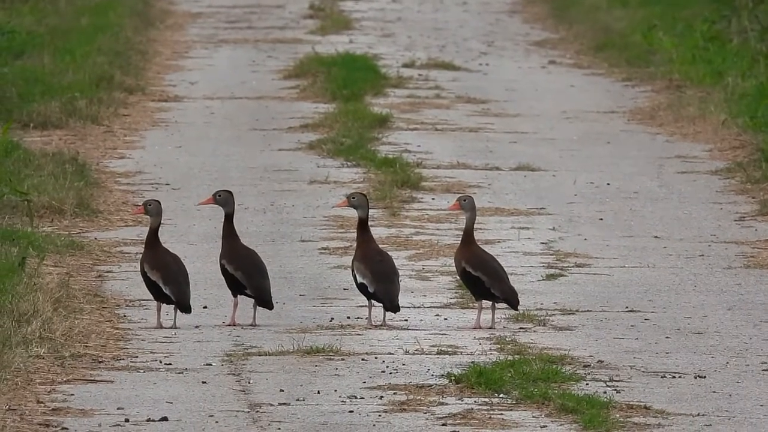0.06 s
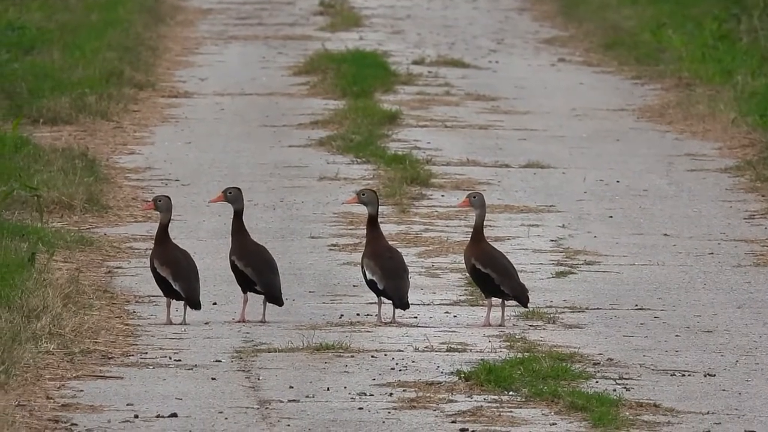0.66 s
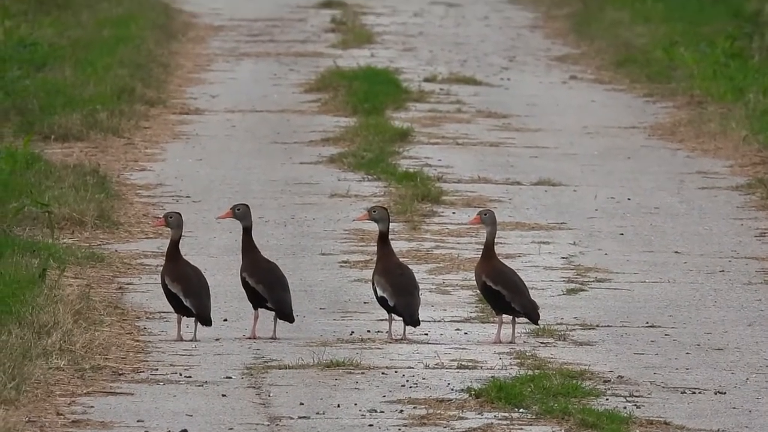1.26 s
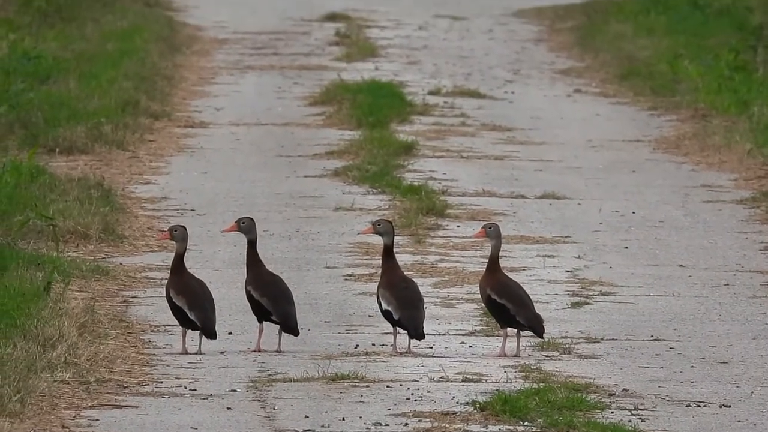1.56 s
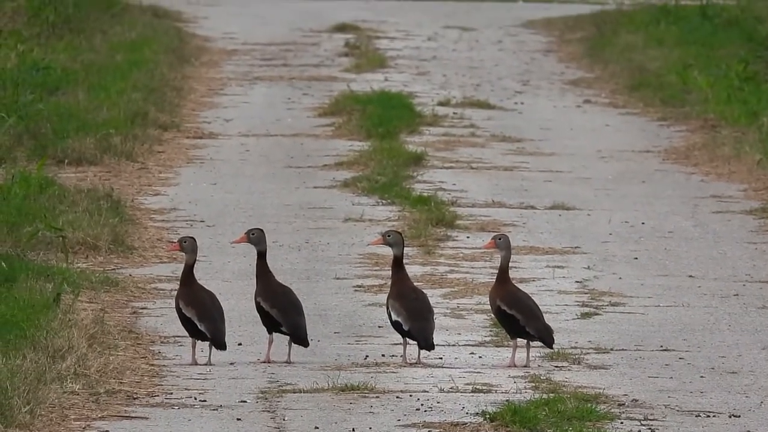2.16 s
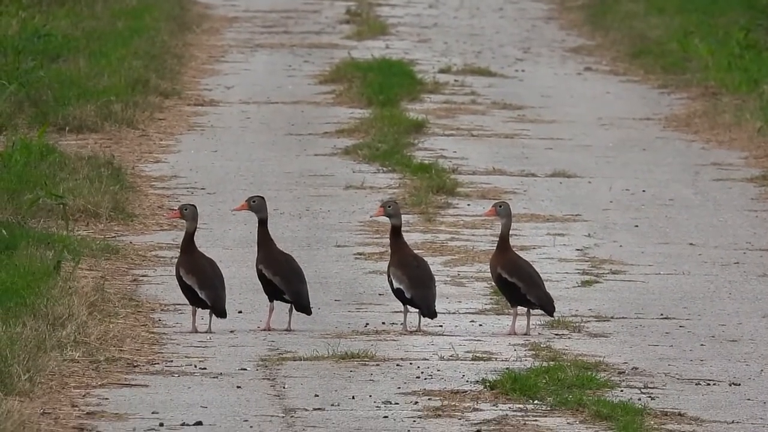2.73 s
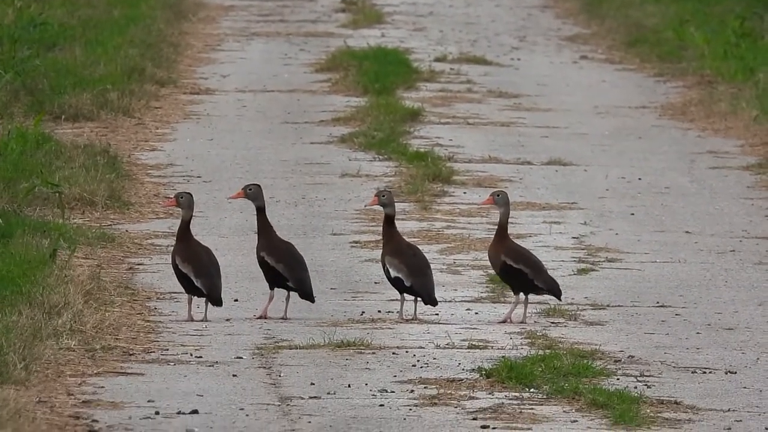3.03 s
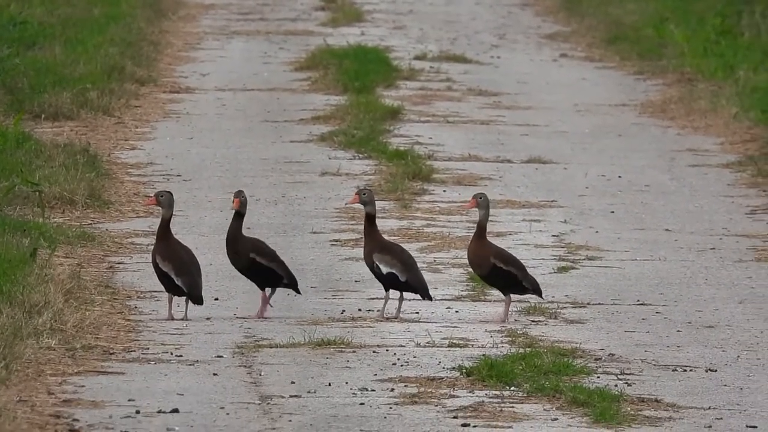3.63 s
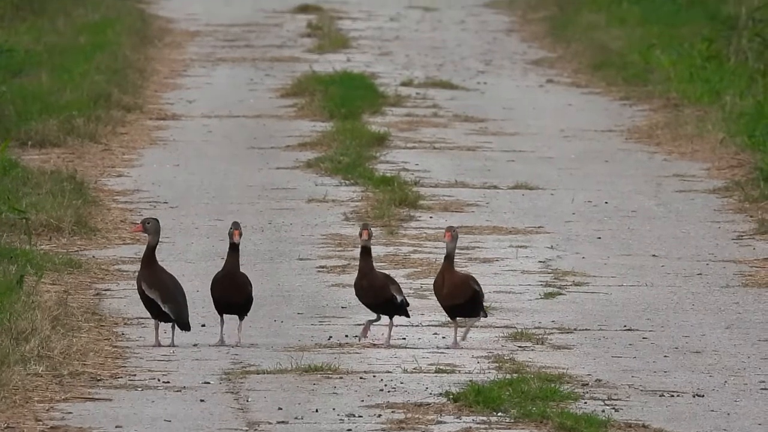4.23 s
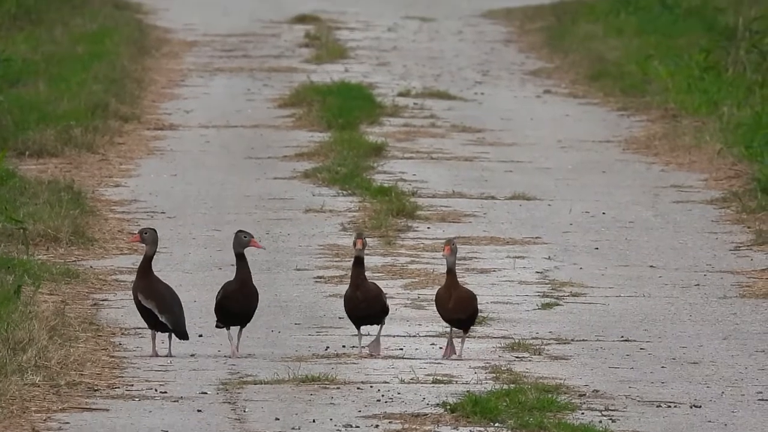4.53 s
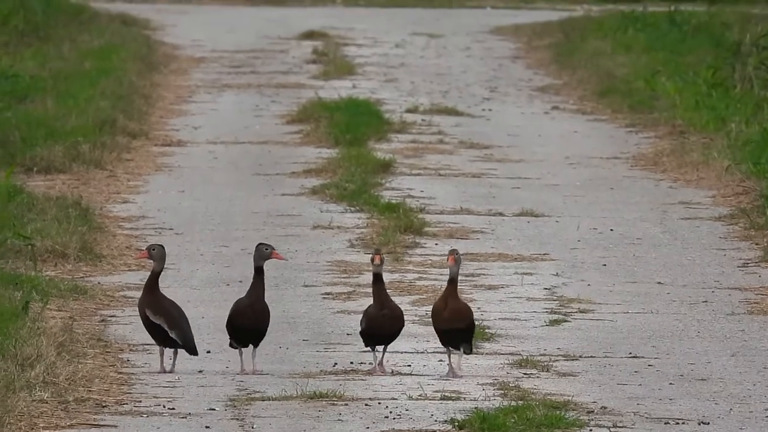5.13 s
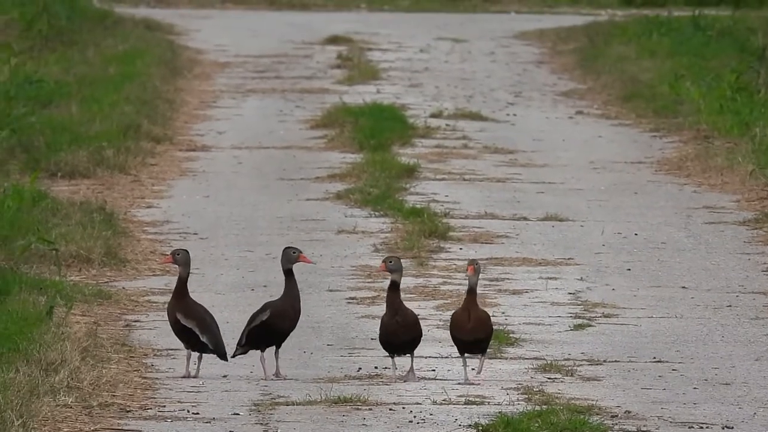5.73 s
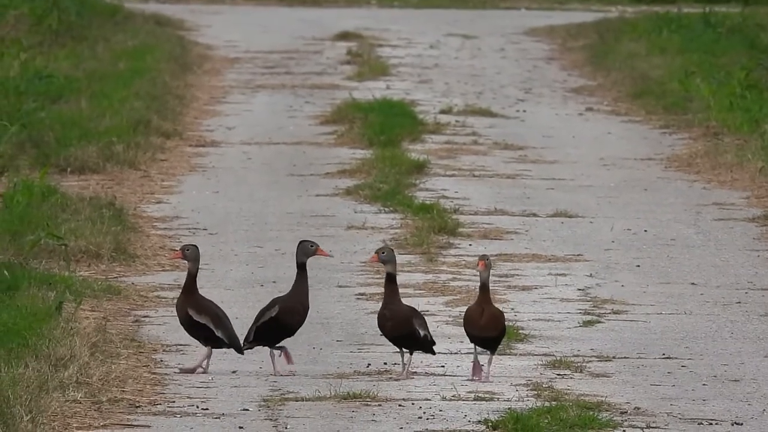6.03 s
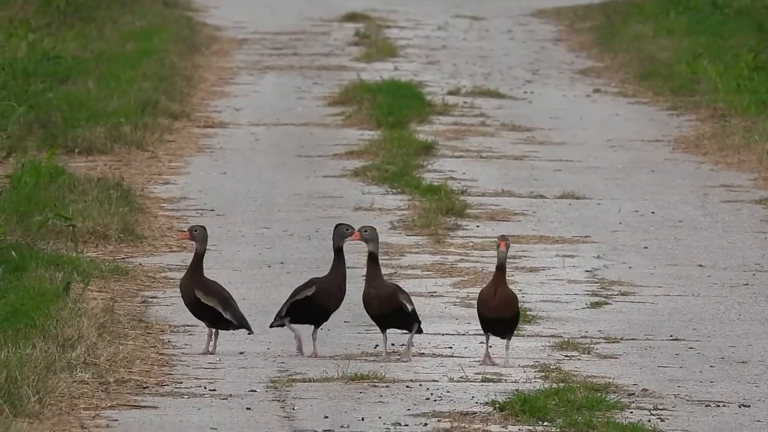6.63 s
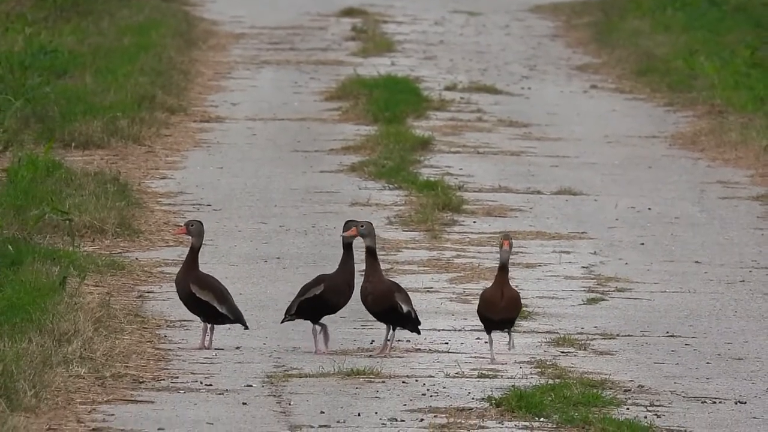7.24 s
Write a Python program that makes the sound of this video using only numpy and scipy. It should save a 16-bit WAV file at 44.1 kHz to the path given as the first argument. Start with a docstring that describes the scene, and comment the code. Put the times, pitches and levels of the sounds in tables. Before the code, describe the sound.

High duck whistles and chirps thin out halfway through, over gusty wind rumble and a few faint handling clicks.

```python
"""A flock of whistling ducks in open country, the nearer birds standing out of a distant chorus that
thins half way through. Each syrinx gives level whistles, hoarse squeals, low wheezes, or chirps that step
between the resonances of a long windpipe; bushes and banks scatter a faint tail. Right at the microphone,
wind buffets the two ports, mostly the left, and the hand-held camera gives a few small clicks.
Far off lies a soft wash of wind and grass."""
import sys
import numpy as np
from scipy import signal
from scipy.fft import rfft, irfft, next_fast_len
from scipy.io import wavfile
from scipy.ndimage import uniform_filter1d, minimum_filter1d, map_coordinates

SR = 44100
rng = np.random.default_rng(int(sys.argv[2]) if len(sys.argv) > 2 else 0)


def transcribe(signal):
    """Save signal, clipped to [-1, 1], as a 16-bit WAV file at the path in sys.argv[1]."""
    frames = np.atleast_2d(signal).T
    limited = np.clip(frames, -1, 1)
    pcm = np.round(limited * 32767).astype(np.int16)
    wavfile.write(sys.argv[1], SR, pcm)


N = 325899

# distant wind and grass: spectrum (f/Hz, level/dB) and strength (t/s, level/dB)
AIR_SPECTRUM = [(25, -57), (100, -5), (250, 10.5), (550, -3.5), (950, -2.5), (1400, -17.5), (2000, -25),
                (5000, -33.5), (13000, -76)]
AIR_LEVEL = [(0, -35), (3.3, -35), (3.9, -43.5)]

# knocks on the camera (t/s, click level/dB, left minus right/dB, thump level/dB)
HANDLING_KNOCKS = [(0.464, -52, 16, -41), (1.549, -48, -11, -50), (2.7304, -53, 9, -56),
                   (3.5195, -58, 9, -46), (3.647, -69, 8, -57), (3.852, -46.5, 25, -52),
                   (4.276, -64, 7, -59), (5.589, -45, 29, -40), (7.291, -63, 8, -48)]
# spectra of the click and of the thump in the camera body (f/Hz, level/dB)
CLICK_SPECTRUM = [(1000, -11), (5000, 6), (15000, -1.5)]
THUMP_SPECTRUM = [(30, -5), (70, 0), (700, -60)]

# wind strength on each microphone port (t/s, level/dB)
LEFT_GUSTS = [(0.0, -48), (0.32, -24.5), (0.38, -13), (0.46, -18), (0.54, -27), (0.72, -21), (1.02, -25.5),
              (1.28, -14.5), (1.54, -28.5), (1.74, -14.5), (1.9, -21), (2.92, -18), (3.0, -30.5),
              (3.2, -16.5), (3.4, -21.5), (3.62, -9.5), (3.74, -18), (3.8, -36), (3.84, -15), (4.04, -17),
              (4.36, -12), (4.46, -16), (4.78, -14), (4.9, -34), (5.0, -17), (5.14, -33), (5.2, -15.5),
              (5.24, -29.5), (5.4, -14.5), (5.46, -28), (5.56, -13.5), (5.92, -22), (5.96, -32),
              (6.16, -20.5), (6.96, -13.5), (7.22, -25.5), (7.34, -19.5), (7.38, -28.5)]
RIGHT_GUSTS = [(0.0, -25), (0.32, -45.5), (0.4, -26), (1.64, -21), (1.68, -37), (1.74, -11.5), (1.88, -30),
               (1.98, -15), (2.18, -50), (2.5, -43), (2.64, -20), (3.02, -38.5), (3.18, -21.5), (3.72, -30),
               (3.8, -44.5), (5.0, -45), (5.14, -25.5), (5.4, -20), (5.46, -34), (5.58, -19.5), (5.82, -32),
               (5.94, -20.5), (6.0, -33.5), (6.36, -28), (6.46, -47.5), (7.38, -38)]
# how finely the wind breaks up (t/s, small-eddy level/dB)
WIND_BREAKUP = [(0, -18), (3.3, -21), (3.7, -11), (4.1, -16), (4.65, -8), (5.7, -2), (6.4, -16.5),
                (7.39, -14.5)]
# spectra of the wind's body and of its small eddies (f/Hz, level/dB)
WIND_SPECTRUM = [(20, -60), (55, -68), (100, -35.5), (150, -8), (220, -0.5), (310, 2.5), (480, -2.5),
                 (700, -16.5), (1000, -32.5), (1500, -50.5), (2200, -53), (7000, -114)]
FINE_SPECTRUM = [(40, -48.5), (200, -1.5), (550, 12), (900, -1.5), (1400, -16), (2200, -52), (6000, -99.5)]
# single hard eddies on the ports (t/s, thud level/dB, left minus right/dB, crunch level/dB)
HARD_EDDIES = [(0.074, -27.5, -12, -53), (0.447, -15.5, 22, -50), (1.537, -15, -23, -40),
               (1.712, -15.5, -18, -34.5), (1.746, -24, -13, -45), (1.778, -31, 16, -55),
               (2.559, -17.5, 7, -47), (2.714, -17.5, 25, -49), (2.894, -23, 11, -55),
               (3.166, -20.5, 4, -54), (3.386, -18.5, -16, -46), (3.6, -6.5, 30, -30),
               (3.67, -15.5, 26, -50), (3.837, -16, 36, -38), (3.903, -33, 23, -57),
               (4.322, -17.5, 28, -33), (4.353, -16.5, 30, -38), (4.55, -28, 24, -57),
               (4.62, -10, 33, -34.5), (4.719, -29, 26, -40), (5.161, -21, -24, -36),
               (5.275, -28.5, -3, -44), (5.386, -22, -18, -34), (5.405, -12.5, 19, -51),
               (5.551, -20, 7, -37), (5.572, -24, 8, -41), (5.619, -24.5, 13, -45), (5.919, -23, -18, -37),
               (6.165, -18, 14, -52), (6.565, -37, 22, -48), (6.74, -19, 28, -52), (6.845, -19.5, 24, -44),
               (7.015, -19.5, 18, -43), (7.285, -17, 22, -57), (7.332, -15, 24, -63)]
# spectra of their thud and crunch (f/Hz, level/dB)
THUD_SPECTRUM = [(40, -50.5), (200, -6.5), (400, 11), (900, -9), (2000, -44.5), (9000, -71)]
CRUNCH_SPECTRUM = [(200, -25), (800, 0), (1400, -3), (2400, -21), (5000, -44), (12000, -75)]

# bearing of the flock from the microphone (t/s, side: 0 ahead, 1 well to the left, negative to the right)
FLOCK_BEARING = [(0, -0.025), (1.2, -0.11), (2.3, -0.6), (3.3, 0.43), (4.6, 0.82), (5.35, 0.24),
                 (5.8, 0.68), (7.39, 0.91)]
# the far flock: strength (t/s, level/dB) and colouring of its voices (f/Hz, level/dB)
FAR_LEVEL = [(0, -42), (.4, -41.5), (.65, -48.5), (1.25, -42.5), (2.0, -46.5), (2.7, -47.5), (3.4, -49),
             (3.8, -68.5), (4.9, -67.5), (5.4, -60.5), (6.4, -59.5), (7.39, -61)]
FAR_SPECTRUM = [(1400, -31.5), (2000, 1), (2500, 2.5), (2900, 8.5), (3600, 2), (4600, 4), (6000, -7.5),
                (7500, -5.5), (9500, -24.5), (13000, -28.5)]
# harmonics 1, 2, ... of the far calls (level/dB)
FAR_WHEEZE_HARMONICS = [-11.5, -3, -4.5, -7.5, -6, -10.5, -7]
FAR_PEEP_HARMONICS = [-2.5, 0, -4]
FAR_TWITTER_HARMONICS = [1.5, -12]

# nearer birds, arching calls (t/s, rise/s, fall/s, first f/Hz, crest f/Hz, level/dB)
NEAR_CHIRPS = [(0.058, 0.072, 0.032, 3670.0, 4190.0, -38.5), (0.112, 0.033, 0.0, 3500.0, 3760.0, -41),
               (0.113, 0.034, 0.034, 4830.0, 4980.0, -47), (0.163, 0.032, 0.044, 4130.0, 4810.0, -47.6),
               (0.212, 0.042, 0.023, 4430.0, 4520.0, -40.5), (0.307, 0.087, 0.0, 3300.0, 4570.0, -39),
               (0.309, 0.032, 0.027, 4130.0, 4560.0, -43), (0.334, 0.063, 0.0, 3770.0, 5540.0, -39),
               (0.498, 0.031, 0.011, 3690.0, 5250.0, -48), (0.594, 0.035, 0.0, 3370.0, 4460.0, -48),
               (0.862, 0.018, 0, 3900.0, 4180.0, -47.5), (0.964, 0.047, 0.0038, 3800.0, 4510.0, -49),
               (0.983, 0.068, 0.031, 4490.0, 6160.0, -51.2), (1.213, 0.025, 0.0094, 4170.0, 4830.0, -49.5),
               (1.264, 0.044, 0.0, 4530.0, 5510.0, -41), (1.356, 0.012, 0, 3970.0, 4700.0, -51),
               (1.471, 0.023, 0.034, 4750.0, 5220.0, -48), (1.477, 0.033, 0.033, 5530.0, 5780.0, -51),
               (1.541, 0.036, 0.017, 4130.0, 5040.0, -45.5), (1.607, 0.034, 0.0041, 4190.0, 4610.0, -47),
               (1.78, 0.046, 0.079, 3870.0, 5960.0, -48.5), (1.789, 0.026, 0.0067, 3870.0, 4560.0, -46.3),
               (1.857, 0.066, 0.022, 4350.0, 4460.0, -51), (1.929, 0.031, 0.031, 4270.0, 5180.0, -46),
               (1.948, 0.028, 0.065, 3950.0, 4420.0, -44.9), (2.053, 0.038, 0.0, 4030.0, 5180.0, -42.5),
               (2.137, 0.055, 0.069, 3770.0, 5320.0, -42), (2.315, 0.033, 0.022, 4130.0, 5070.0, -45.5),
               (2.348, 0.054, 0.014, 4570.0, 6640.0, -53), (2.488, 0.044, 0.021, 3170.0, 5410.0, -47),
               (2.619, 0.034, 0.015, 3770.0, 5160.0, -39), (2.831, 0.035, 0.0, 3070.0, 3610.0, -46.8),
               (2.923, 0.082, 0.0, 3330.0, 3810.0, -50), (3.112, 0.097, 0.013, 3160.0, 4310.0, -50.2),
               (3.228, 0.056, 0.0, 3330.0, 4570.0, -52), (3.391, 0.056, 0.0098, 3470.0, 4630.0, -50),
               (4.032, 0.069, 0.024, 3330.0, 4950.0, -64.5), (4.156, 0.034, 0.026, 3870.0, 4300.0, -64.3),
               (4.297, 0.11, 0.024, 2930.0, 5040.0, -56.5), (4.944, 0.017, 0.0052, 4210.0, 5260.0, -59.5),
               (4.964, 0.031, 0.018, 4970.0, 6070.0, -62), (4.976, 0.02, 0.019, 3630.0, 4170.0, -58),
               (5.501, 0.03, 0.044, 4940.0, 5690.0, -63.5), (5.667, 0.067, 0.0, 4160.0, 4350.0, -63.5),
               (5.807, 0.046, 0.0042, 4140.0, 4660.0, -58.5), (5.867, 0.057, 0.0, 4390.0, 4610.0, -63),
               (6.524, 0.037, 0.0, 4230.0, 4660.0, -56.5), (6.682, 0.083, 0.0, 2970.0, 3710.0, -55.6),
               (6.804, 0.039, 0.0029, 4270.0, 4790.0, -58.5), (6.961, 0.087, 0.014, 3530.0, 4690.0, -56.5),
               (7.021, 0.052, 0.0, 4370.0, 5910.0, -56), (7.163, 0.047, 0.0, 3970.0, 5680.0, -52)]
NEAR_WHEEZES = [(2.67, 0.077, 0.025, 1670, 1900, -59), (3.4, 0.05, 0.039, 1500, 1610, -54),
                (5.15, 0.13, 0.011, 1300, 1400, -61.5), (5.27, .155, 0.072, 1334, 1580, -54),
                (5.78, .15, 0.0083, 1370, 1574, -62.5), (6.1, .19, 0.041, 1460, 1570, -61)]
# nearer birds, held notes (t/s, rise/s, fall/s, crest f/Hz, level/dB)
NEAR_WHISTLES = [(0.0, 0.0078, 0.087, 3250, -37), (0.006, 0.017, 0.023, 2890, -41),
                 (0.067, 0.1, 0.121, 3110, -45), (0.144, 0.03, 0.17, 3140.0, -40.0),
                 (0.247, 0.049, 0.082, 2833, -37.5), (0.387, 0.021, 0.013, 3430, -45.5),
                 (0.433, 0.025, 0.16, 2825, -42), (0.467, 0.061, 0.09, 3056, -44.5),
                 (0.682, 0.039, 0.062, 2830, -42), (0.761, 0.014, 0.027, 3400, -40.5),
                 (0.867, 0.0086, 0.042, 2870, -41.5), (1.027, 0.042, 0.064, 3220, -46),
                 (1.095, 0.13, 0.0023, 3560, -43.5), (1.274, 0.022, 0.042, 2910.0, -48),
                 (1.355, 0.018, 0.019, 3380.0, -43), (1.427, 0.049, 0.054, 2600, -45),
                 (1.557, 0.051, 0.07, 2950.0, -50.5), (1.667, 0.056, 0.039, 2820.0, -42),
                 (1.877, 0.031, 0.038, 2770, -45), (1.955, 0.044, 0.12, 2850, -38.5),
                 (2.077, 0.024, 0.041, 2980, -42.5), (2.517, 0.033, 0.043, 2960, -45.5),
                 (2.615, 0.018, 0.039, 2720, -42.2), (2.596, 0.054, 0.056, 3220, -45.5),
                 (2.652, 0.005, 0.055, 3600, -44), (2.697, 0.024, 0.11, 2990, -44.5),
                 (2.945, 0.12, 0.085, 2810, -42.5), (3.073, 0.11, 0.14, 3094, -45),
                 (3.192, 0.019, 0.098, 2750.0, -41.5), (3.3, 0.065, 0.068, 3210, -42.5),
                 (3.456, 0.029, 0.025, 3220, -44), (3.483, 0.057, 0.116, 3070, -50),
                 (3.758, 0.016, 0.024, 2890, -46), (3.747, 0.095, 0.014, 3180, -55),
                 (3.943, 0.088, 0.0, 3000.0, -47), (4.442, 0.011, 0.021, 2750.0, -54.5),
                 (4.594, 0.021, 0.066, 2914, -51), (5.4, 0.029, 0.079, 3020.0, -52),
                 (5.667, 0.008, 0.11, 3120, -56.5), (6.121, 0.047, 0.095, 3090, -51.5),
                 (6.337, 0.094, 0.053, 3040, -48.5), (6.324, 0.093, 0.031, 3260.0, -56),
                 (6.535, 0.023, 0.094, 3020, -47), (6.613, 0.011, 0.012, 2750, -55),
                 (6.7, 0.003, 0.064, 2950, -53.5), (6.762, 0.018, 0.024, 3320, -49.5),
                 (7.147, 0.077, 0.034, 3070, -53)]
NEAR_SQUEALS = [(0, .08, 0.12, 3390, -48.5), (.29, 0.079, 0.056, 3350, -48.5),
                (2.5, 0.063, 0.025, 3790, -45.5), (2.59, .13, 0.0083, 3880, -48.5),
                (6.455, 0.023, .035, 3080, -52.5)]
THIN_OVERTONES = [(.17, 0.027, 0.13, 6480, -50), (1.1, 0.21, 0, 7200, -53), (1.97, 0.066, 0, 7440, -56),
                  (3.39, .05, 0.19, 9420, -65.5)]
# harmonics 1, 2, ... of the nearer calls (level/dB)
CHIRP_HARMONICS = [0.5, -28]
WHEEZE_HARMONICS = [-29.5, -2, -0.5, -0.5, -10.5, -18, -21.5]
WHISTLE_HARMONICS = [0.5, -26, -32]
SQUEAL_HARMONICS = [2, -11, -19]


def undb(db):
    """Decibels to gain."""
    return 10 ** (np.asarray(db) / 20)


def unit(x):
    """Scale to rms 1."""
    return x / np.sqrt(np.mean(x ** 2))


def curve(rows):
    """Join (t/s, value) rows with straight lines."""
    return np.interp(np.arange(N) / SR, *np.transpose(rows))


def colour(x, spectrum):
    """Causal filter through (f/Hz, level/dB) points."""
    hz, db = np.transpose(spectrum)
    size = next_fast_len(2 * N, real=True) // 2 * 2
    bins_hz = np.arange(size // 2 + 1) * SR / size
    gain = undb(np.interp(np.log(bins_hz + 1), np.log(hz), db))
    # folding the cepstrum gives minimum phase
    cepstrum = irfft(np.log(gain))
    cepstrum[1:size // 2] *= 2
    cepstrum[size // 2 + 1:] = 0
    return irfft(rfft(x, size) * np.exp(rfft(cepstrum)))[..., :N]


def walk(rate, size=N):
    """Smooth chance that turns about `rate` times a second; spread near 1."""
    steps = rng.standard_normal(8192)
    return map_coordinates(steps, [np.arange(size) * rate / SR], order=2, mode="wrap")


def sides(pan_db):
    """Left and right gains, pan_db apart, of constant total power."""
    return unit(undb(np.array([[pan_db], [-pan_db]]) / 2))


def add(out, start, sound):
    """Mix a sound in at its time."""
    i = int(np.clip(start * SR, 0, N))
    out[:, i:i + sound.shape[-1]] += sound[..., :N - i]


def distant_air(width=0.38):
    """A soft, wide wash of wind and grass, far from the microphone."""
    mid, side = colour(rng.standard_normal((2, N)), AIR_SPECTRUM)
    wash = unit(np.array([mid + width * side, mid - width * side]))
    return wash * undb(curve(AIR_LEVEL) + walk(7.6))


def knocks(rows, spectrum, decay_s, gain_db):
    """Brief bursts of pressure through a resonance, each scaled by its peak."""
    out, t = np.zeros((2, N)), np.arange(2048) / SR
    response = colour(signal.unit_impulse(N), spectrum)[:len(t)]
    for start, db, pan_db in rows:
        pressure = rng.standard_normal(len(t)) * np.exp(-t / decay_s)
        burst = signal.fftconvolve(pressure, response)
        add(out, start, burst / np.abs(burst).max() * undb(db + gain_db) * sides(pan_db))
    return out


def handling():
    """Each knock of the hand clicks at the microphone and thumps through the camera body."""
    rows = np.array(HANDLING_KNOCKS)
    clicks = knocks(rows[:, :3], CLICK_SPECTRUM, decay_s=.00093, gain_db=9)
    thumps = knocks(rows[:, [0, 3, 2]], THUMP_SPECTRUM, decay_s=.004, gain_db=4)
    return clicks + thumps


def port_wind(gusts, flutter_db, gain_db=0, sway_db=1.26):
    """Eddies tumble over one port in quick bursts; harder gusts break into smaller, brighter ones."""
    gust_db = curve(gusts) + sway_db * walk(17)
    breakup_db = curve(WIND_BREAKUP)
    eddies = rng.standard_normal(N) * undb(flutter_db * walk(130))
    body = unit(colour(eddies, WIND_SPECTRUM))
    deep = unit(signal.sosfilt(signal.butter(4, 141.8, fs=SR, output="sos"), body))
    fine = unit(colour(eddies * undb(5.55 * walk(300)), FINE_SPECTRUM))
    rumble = body + undb(-28 - breakup_db) * deep + undb(breakup_db + gust_db + 17) * fine
    # the gust sets the strength, the eddies only its grain
    running_rms = np.sqrt(uniform_filter1d(rumble ** 2, SR // 14))
    return rumble / running_rms * undb(gust_db + gain_db)


def lulls(stall_s=.02, dip_db=-4.5):
    """Gain of the wind at the ports: the flow stalls just before each hard eddy breaks."""
    t = np.arange(N) / SR
    stalled = sum((t > start - stall_s) & (t < start) for start, *_ in HARD_EDDIES)
    return undb(dip_db * uniform_filter1d(np.minimum(stalled, 1.), size=128))


def buffets():
    """Each hard eddy thuds right on the port with a short, brighter crunch."""
    rows = np.array(HARD_EDDIES)
    thuds = knocks(rows[:, :3], THUD_SPECTRUM, decay_s=.0095, gain_db=6)
    crunch = knocks(rows[:, [0, 3, 2]], CRUNCH_SPECTRUM, decay_s=.012, gain_db=4)
    return thuds + crunch


def field_scatter(calls, t60_s=1.0, wet_db=-14):
    """Bushes and banks scatter a short, diffuse tail back to each port."""
    t = np.arange(SR) / SR
    tail = rng.standard_normal((2, SR)) * np.exp(-np.log(1000) * t / t60_s)
    scattered = signal.fftconvolve(calls, unit(tail) / np.sqrt(SR), axes=1)[:, :N]
    return calls + undb(wet_db) * scattered


def off_axis(calls, lead_s=.00009, shade_db=4.5):
    """Birds off to one side reach that port earlier and louder, by lead_s and shade_db at side 1."""
    side = curve(FLOCK_BEARING)
    ports = []
    for channel, half in zip(calls, (.5, -.5)):
        shifted = map_coordinates(channel, [np.arange(N) + half * side * lead_s * SR], order=3)
        ports.append(shifted * undb(half * side * shade_db))
    return np.array(ports)


def arch(rise_s, fall_s, first_hz, crest_hz, last_hz):
    """Pitch of one call: it climbs, rounds off at the crest, then droops."""
    up, down = (np.linspace(0, np.pi / 2, int(s * SR)) for s in (rise_s, fall_s))
    return np.concatenate([first_hz + (crest_hz - first_hz) * np.sin(up),
                           last_hz + (crest_hz - last_hz) * np.cos(down)])


def windpipe(hz, pull, detune_hz, resonance_hz=5082, spacing_hz=701):
    """With pull above 0, a sweep clings to each windpipe resonance and fades as it jumps to the next."""
    def offset(f):
        return 2 * np.pi * (f - resonance_hz - detune_hz) / spacing_hz
    gain = 1 - pull * np.sin(offset(hz) / 2) ** 4
    for _ in range(2):
        hz = hz - pull * spacing_hz / (2 * np.pi) * np.sin(offset(hz))
    return hz, gain


def syrinx(pitch_hz, harmonics_db, waver, wander, pull=0, spread_db=3, port_lag_s=.00004):
    """One call: the syrinx follows its pitch, trembling and rasping as the note swells and fades."""
    size = len(pitch_hz)
    drifting_hz = pitch_hz * (1 + wander * walk(45, size))
    hz, pipe_gain = windpipe(drifting_hz, pull, detune_hz=60 * rng.standard_normal())
    hz = hz * (1 + waver * walk(260, size))
    # each bird stands in its own direction, so it reaches one port a little earlier
    lag, pan = rng.standard_normal(2)
    phase = 2 * np.pi * (np.cumsum(hz) / SR + hz * lag * port_lag_s * np.array([[.5], [-.5]]))
    tone = sum(undb(db) * np.sin(k * phase) * (k * hz < SR / 2) for k, db in enumerate(harmonics_db, 1))
    progress = np.linspace(0, 1, size)
    swell = np.sin(np.pi / 2 * np.minimum(np.minimum(progress, 1 - progress) / .15, 1))
    flutter = undb(2 * walk(104, size) + 2 * walk(28, size))
    # an unsteady voice is also a raspy one
    rasp = 1 + 20 * waver * walk(700, size)
    return np.sqrt(2) * tone * swell * flutter * pipe_gain * rasp * sides(spread_db * pan)


def far_ducks(count=400, gain_db=3.5):
    """Across the field, reedy wheezes, short peeps and stepping twitters overlap, blurred by distance."""
    out = np.zeros((2, N))
    for i, (jitter, kind, pitch, length, bend, loud) in enumerate(rng.random((count, 6))):
        if kind < .25:
            span, hz = .07 + .068 * length, 1300 + 400 * pitch
            contour = arch(span / 2, span / 2, hz * (1 - .16 * bend), hz, hz * (.86 + .14 * bend))
            call = syrinx(contour, FAR_WHEEZE_HARMONICS, waver=.0067, wander=.008)
        elif kind < .5:
            span, hz = .033 + .031 * length, 2300 + 1300 * pitch
            contour = arch(span / 2, span / 2, hz * .88, hz, hz * (.82 + .17 * bend))
            call = syrinx(contour, FAR_PEEP_HARMONICS, waver=.008, wander=.011)
        else:
            span, hz = .027 + .036 * length, 3900 + 3300 * pitch
            contour = arch(span * .6, span * .4, hz * (.9 - .14 * length), hz, hz * (.76 + .15 * bend))
            call = syrinx(contour, FAR_TWITTER_HARMONICS, waver=.011, wander=.008, pull=.4)
        start = (i + jitter) / count * N / SR - .05
        add(out, start, undb(6.5 * loud) * call)
    # their sound crosses more of the field, so it gets a scattering of its own
    chorus = colour(field_scatter(off_axis(out)), FAR_SPECTRUM)
    return unit(chorus) * undb(curve(FAR_LEVEL) + gain_db)


def glides(rows, harmonics_db, gain_db, waver, droop, pull=0):
    """Nearer calls that climb to a crest, then droop by a share of their pitch or break off there."""
    out = np.zeros((2, N))
    for start, rise, fall, first_hz, crest_hz, db in rows:
        contour = arch(rise, fall, first_hz, crest_hz, crest_hz * (1 - droop))
        call = syrinx(contour, harmonics_db, waver, wander=.003, pull=pull, spread_db=3.5)
        add(out, start, undb(db + gain_db) * call)
    return out


def held_notes(rows, harmonics_db, gain_db, waver, scoop=.035):
    """Nearer notes that start just under their pitch and sag at the end."""
    scooped = [(start, rise, fall, hz * (1 - scoop), hz, db) for start, rise, fall, hz, db in rows]
    return glides(scooped, harmonics_db, gain_db, waver, droop=.06)


def near_ducks():
    """The birds closest to the microphone, each call distinct; a stronger waver makes squeals hoarse."""
    chirps = glides(NEAR_CHIRPS, CHIRP_HARMONICS, gain_db=1.8, waver=.005, droop=.14, pull=.42)
    whistles = held_notes(NEAR_WHISTLES, WHISTLE_HARMONICS, gain_db=0, waver=.0037)
    squeals = held_notes(NEAR_SQUEALS, SQUEAL_HARMONICS, gain_db=-4.5, waver=.022)
    wheezes = glides(NEAR_WHEEZES, WHEEZE_HARMONICS, gain_db=-4.5, waver=.005, droop=.12)
    overtones = held_notes(THIN_OVERTONES, harmonics_db=[0], gain_db=-1, waver=.0023)
    return off_axis(chirps + whistles + squeals + wheezes + overtones)


def scene():
    """Ducks near and far in the field, wind and handling right at the microphone."""
    near = near_ducks()
    gusts = np.array([port_wind(LEFT_GUSTS, flutter_db=2, gain_db=.19),
                      port_wind(RIGHT_GUSTS, flutter_db=8.5)])
    hand_noise = handling()
    flock = field_scatter(near + far_ducks())
    return flock + gusts * lulls() + buffets() + hand_noise + distant_air()


def record(dry, ceiling=.82, top_hz=15850):
    """The camera's limiter eases down the hardest gusts, and the top is cut."""
    needed_gain = np.minimum(1, ceiling / (np.abs(dry) + 1e-9))
    held_gain = minimum_filter1d(needed_gain, 401)
    smooth_gain = uniform_filter1d(uniform_filter1d(held_gain, 201), 201)
    top_cut = signal.ellip(8, .2, 70, top_hz, fs=SR, output="sos")
    return signal.sosfilt(top_cut, dry * smooth_gain)


dry = scene()
out = record(dry)
transcribe(out)
```